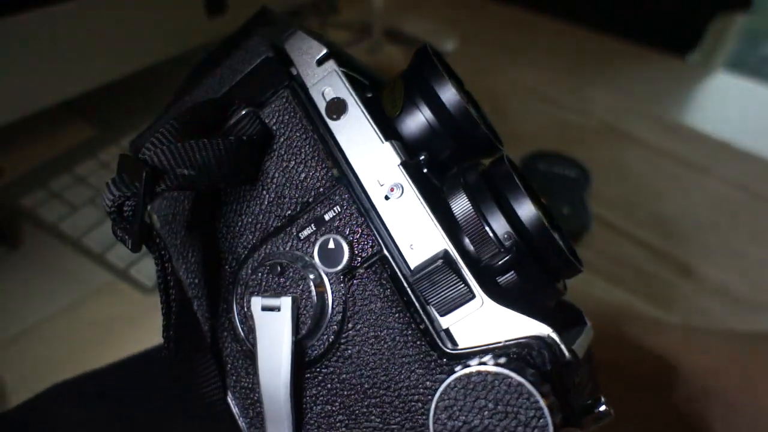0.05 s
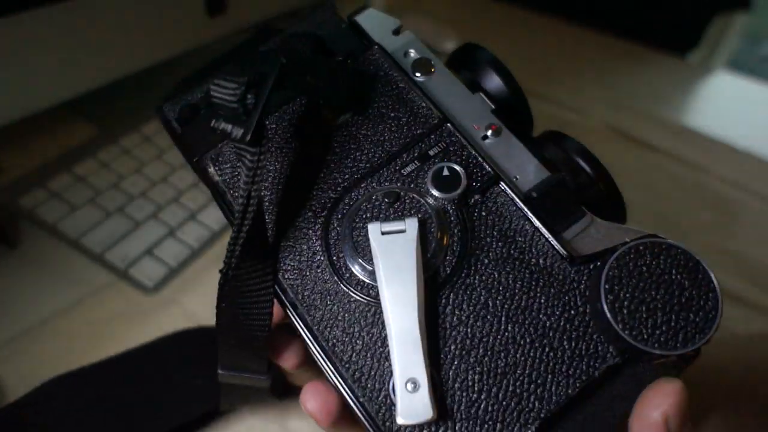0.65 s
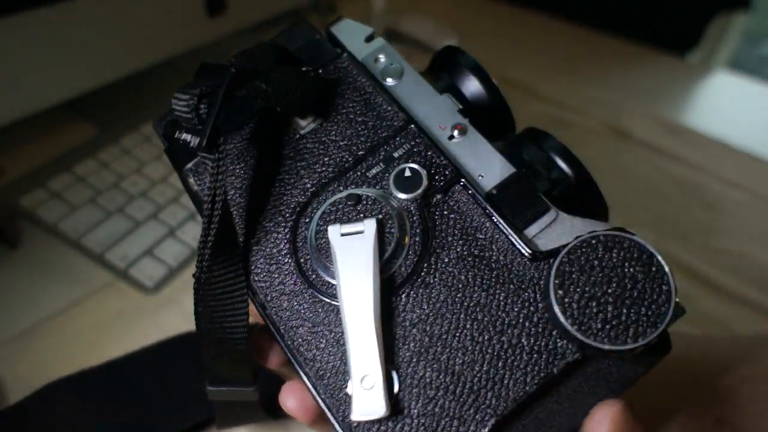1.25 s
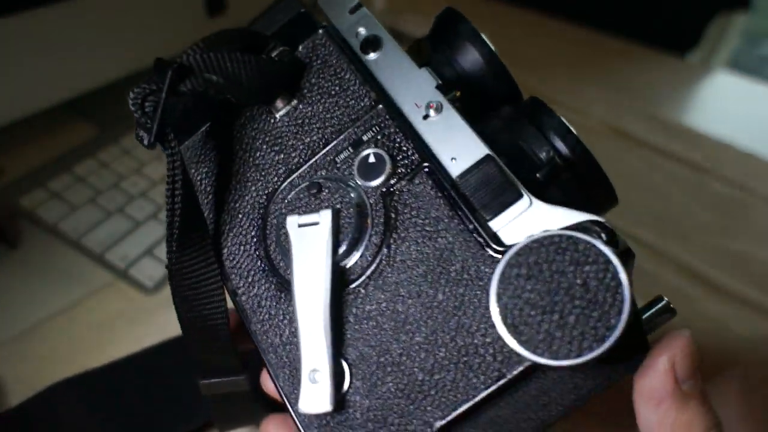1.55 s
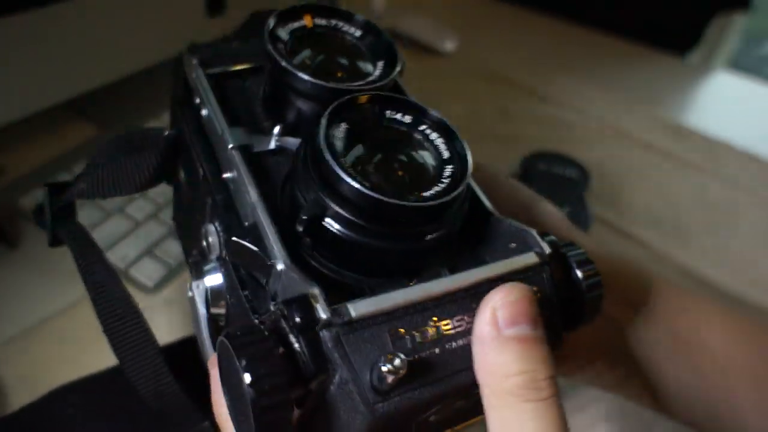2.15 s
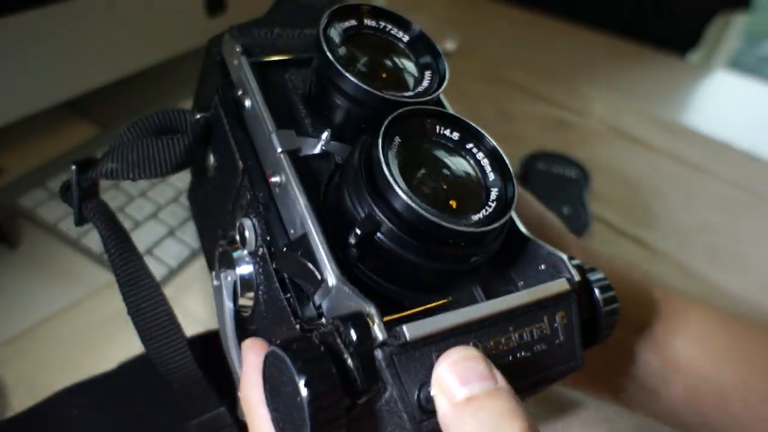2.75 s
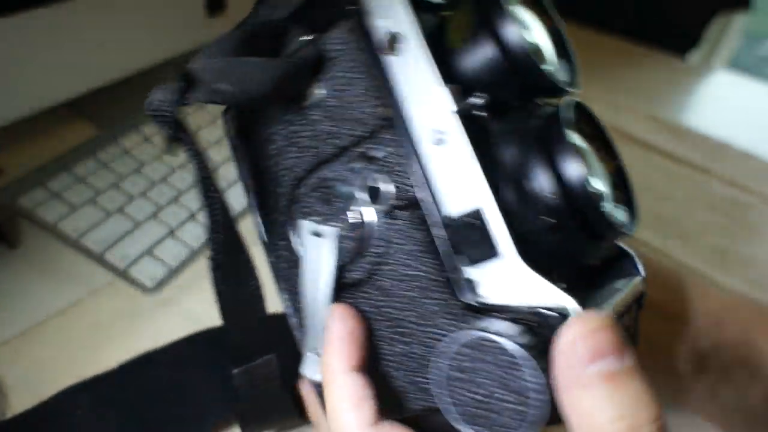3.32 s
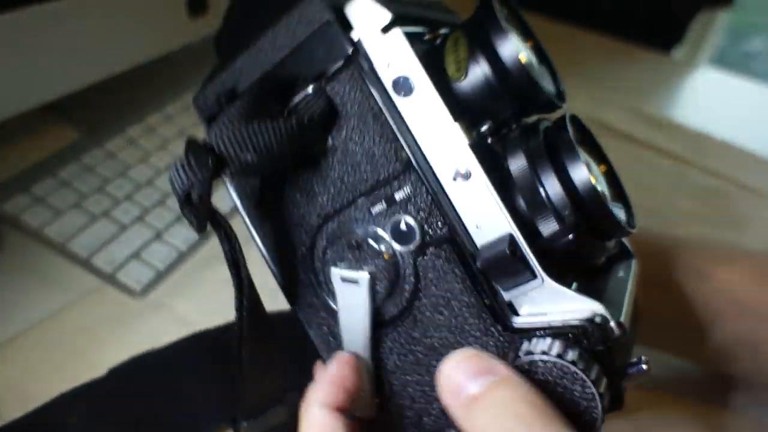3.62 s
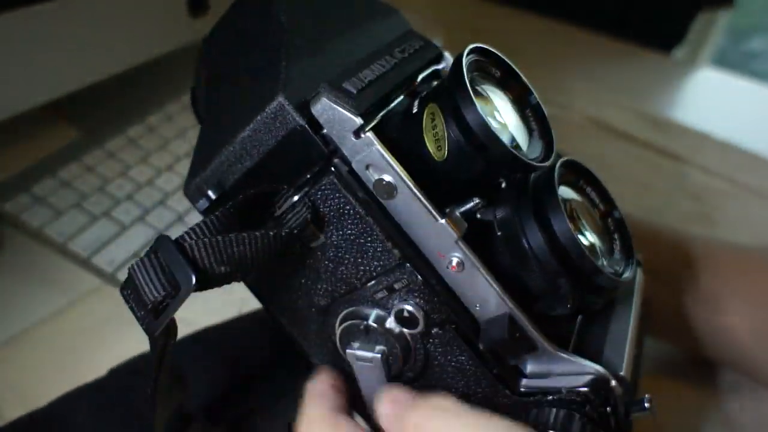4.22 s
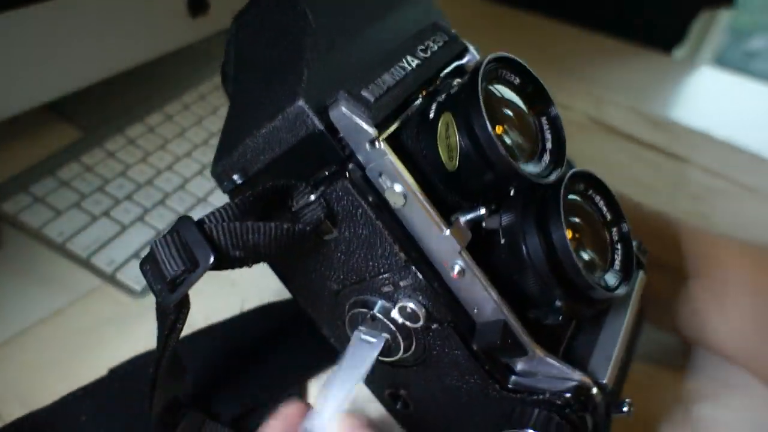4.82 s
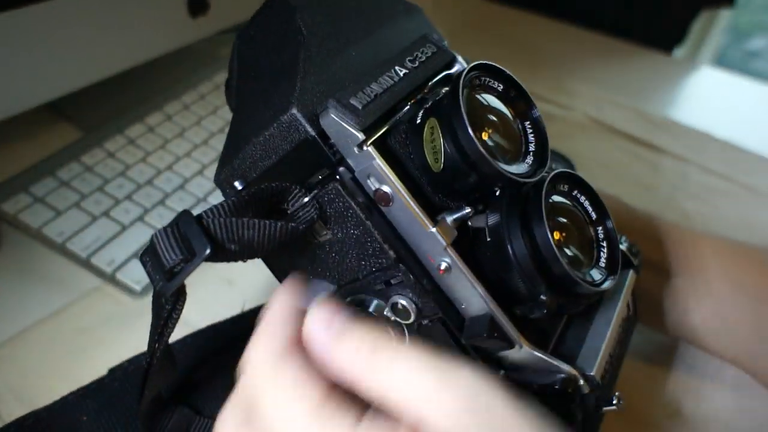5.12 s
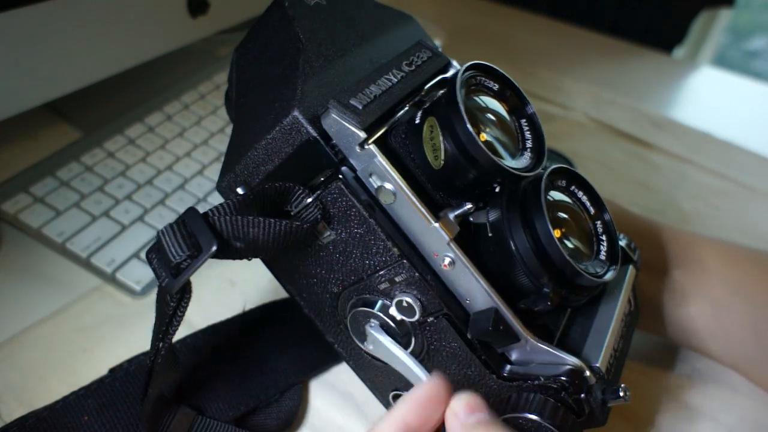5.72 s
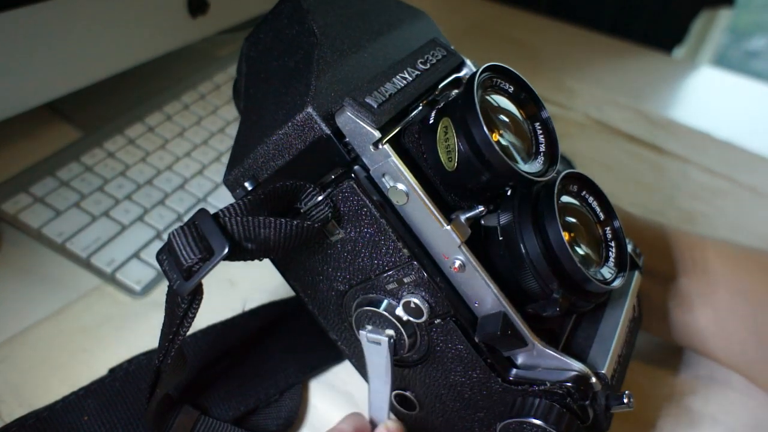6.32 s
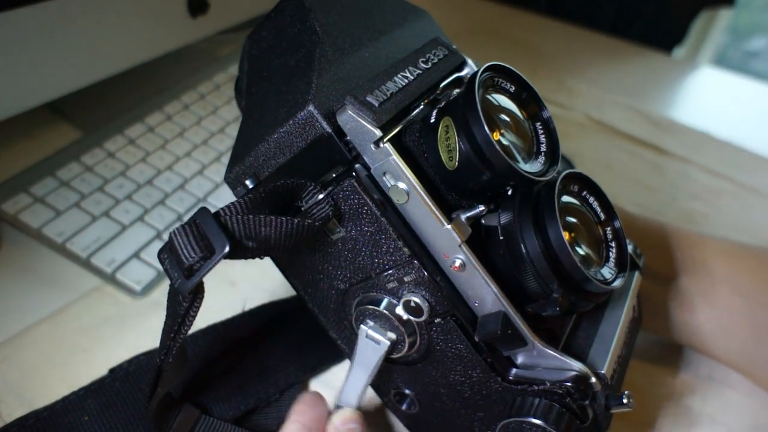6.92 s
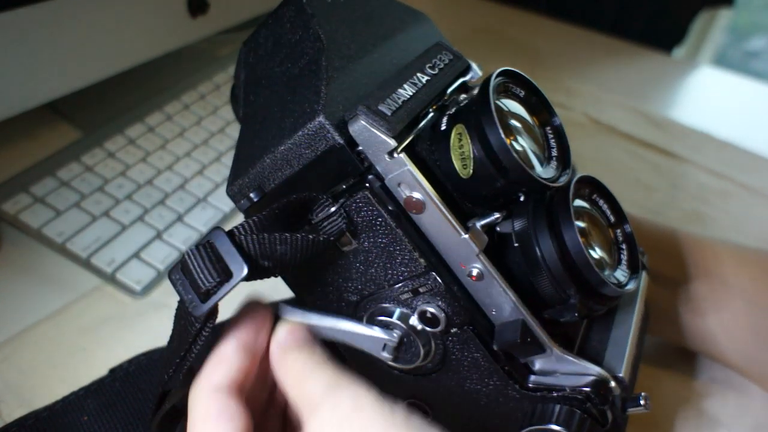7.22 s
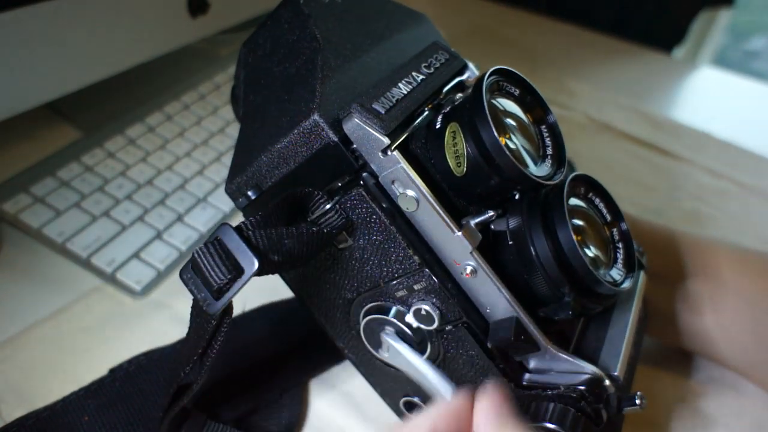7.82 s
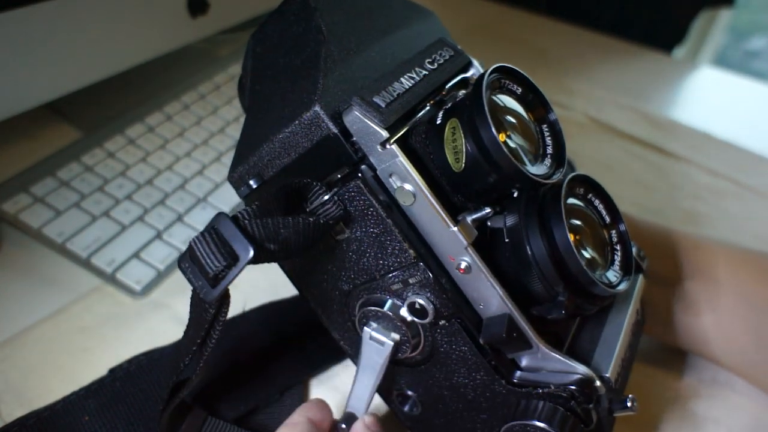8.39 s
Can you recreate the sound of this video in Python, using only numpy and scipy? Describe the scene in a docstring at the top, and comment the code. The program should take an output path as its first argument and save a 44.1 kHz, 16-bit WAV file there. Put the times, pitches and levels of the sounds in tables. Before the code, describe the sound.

A fan hums and hisses softly throughout in a small room, a little to the right. Close to the stereo microphone, a film camera is handled: a faint click and bump come at about 1.7 seconds, then sharper metal clicks near 2.8 and 3 seconds. Around 3.5 seconds the viewing hood snaps open in a quick cluster of bright snaps and hollow, boxy knocks, the loudest moment. The winding crank clacks at 4.5 seconds and again near 5.2, with a faint bump between. From 5.3 to 5.9 seconds it turns with a run of small ratcheting clicks, then inches on in halting ticks until a thin, high snap at about 6.7. From 7 to 8.2 seconds it winds again in a longer, faster ratcheting run, ringing lightly at its quickest near 7.9 seconds. The clicks slow and stop, leaving only the fan.

```python
"""A twin-lens film camera is turned over in the hands and wound, close to a stereo mic in a small room.
Its fittings click, and the viewing hood snaps open and shakes the hollow body. Then the crank goes
round twice, haltingly at first: a pawl drops over the ratchet teeth, and each drop rattles the gears
and rings the wheel. A fan hums and hisses underneath throughout."""
import sys
import numpy as np
from scipy import signal
from scipy.fft import rfft, irfft
from scipy.io import wavfile

SR = 44100
rng = np.random.default_rng(int(sys.argv[2]) if len(sys.argv) > 2 else 0)


def store_wav(level_fs):
    """Save 16-bit WAV to argv[1]."""
    pcm = np.round(np.clip(np.atleast_2d(level_fs), -1, 1) * 32767)
    wavfile.write(sys.argv[1], SR, pcm.T.astype(np.int16))


N = 377055
CLICK_TOP_HZ, BAND_LIMIT_HZ = 11700, 11060

# the colour of the fan's hiss: (frequency [Hz], relative level [dB])
FAN_AIR = [(25, -39), (58, -15), (85, -13), (140, -3.5), (205, -7), (340, -5.5), (800, -5), (1150, -4.5),
           (1900, -3), (3100, -7.5), (4500, -14), (7000, -22.5), (11000, -30)]
# the fan's hum: (frequency [Hz], relative level [dB])
FAN_TONES = [(237, -54.5), (300.5, -57), (716, -59), (816, -58), (1142, -66.5)]
# the fan sits to the right: (frequency [Hz], left minus right [dB])
FAN_PAN = [(60, -5.5), (190, -5.5), (500, -6), (1100, -5.5), (3500, -3.5), (11000, -1)]
# how alike the hiss is at the two capsules: (frequency [Hz], coherence [0-1])
FAN_COHERENCE = [(100, 0.81), (600, 0.57), (2000, 0.67), (5000, 0.33), (11000, 0.32)]
# the hiss is offset between the capsules: (frequency [Hz], right phase lag [rad])
FAN_PHASE = [(100, 0), (1300, 0.63), (2600, 1.56), (5000, 3), (11000, 5.5)]
# catches, springs and fittings snap:
# (time [s], level [dB], centre [Hz], width [Hz], crack level [dB], t60 [s], left minus right [dB])
FITTING_SNAPS = [(1.701, -38, 5000, 4000, -3, 0.026, -3), (2.7870, -25, 3340, 450, 0, 0.05, -4),
                 (2.7876, -25.5, 6040, 450, -7, 0.014, 2), (3.033, -32, 3300, 1500, -4, 0.064, -2),
                 (3.04, -20, 2980, 170, -25, 0.042, -11), (3.042, -30.5, 1100, 700, -22, 0.063, -7),
                 (3.4810, -28, 2900, 700, -16, 0.026, 0), (3.5351, -24.5, 3330, 500, -17, .04, 3),
                 (3.5468, -16, 3640, 400, -5.5, 0.0083, -11), (3.5505, -26, 3430, 450, -11, 0.055, 8),
                 (3.5669, -16, 3400, 600, -12, 0.01, 5), (3.5675, -17, 4900, 450, -12, 0.0077, -7),
                 (3.5891, -28, 2740, 1200, -8, 0.032, -1), (4.899, -42, 5000, 4000, 0, .025, -2),
                 (5.2397, -30, 2950, 700, -11, .022, -5), (6.6545, -27.5, 8840, 1800, -3, 0.019, -8),
                 (6.6560, -39, 10100, 90, -25, 0.11, -3)]
# the dense, short rattle of the gear train: (frequency [Hz], relative level [dB])
GEAR_COLOUR = [(500, -24), (1400, -7), (2750, -9.5), (3150, -4.5), (5200, -5.5), (5800, -8), (7200, -8),
               (9200, -7.5), (10200, -5.5), (11000, -9.5)]
# the hood and the hands bump the body: (time [s], level [dB], hardness [Hz])
BODY_BUMPS = [(1.772, -42.5, 60), (3.487, -31.5, 300), (3.538, -22.5, 250), (3.5515, -22.5, 400),
              (3.5638, -16, 1600), (3.5868, -18.5, 1100), (3.6150, -22, 220), (3.6290, -30.5, 300),
              (4.982, -41.5, 50)]
# the hollow body rings: (frequency [Hz], relative level [dB], t60 [s])
BODY_MODES = [(60, -21, 0.19), (122, -11.5, 0.15), (157, -3, 0.15), (209, 5, 0.13), (278, 3.5, 0.085),
              (375, -1, 0.053), (448, 1.5, 0.056), (508, 4, 0.061), (590, 9.5, 0.054), (730, 11, 0.033),
              (805, 10, 0.037), (1010, 11, 0.028)]
# the crank knocks against its play: (time [s], level [dB], hardness [Hz])
CRANK_KNOCKS = [(4.5112, -26.5, 600), (4.5135, -27, 500), (5.2397, -20.5, 4500), (5.2482, -33, 2500)]
# the crank rings: (frequency [Hz], relative level [dB], t60 [s])
CRANK_MODES = [(1440, 2.5, 0.011), (1576, -2.5, 0.038), (1830, -3, 0.017), (1980, 0.5, 0.013),
               (2330, -5, 0.019), (3100, -0.5, 0.015)]
# the crank is inched on by a single tooth: (time [s])
SINGLE_TEETH = [5.2009, 6.1585, 6.2087, 6.2888, 6.379, 6.508, 6.6066]
# three strokes of the hand on the crank: (time [s], travel [teeth])
FIRST_STROKE = [(5.3377, 0), (5.3958, 3), (5.4659, 6), (5.6116, 9), (5.6488, 10), (5.7295, 14),
                (5.7563, 15), (5.8879, 18)]
NUDGE_STROKE = [(5.996, 0), (6.096, 3)]
SECOND_STROKE = [(6.9493, 0), (7.0028, 1), (7.0739, 3), (7.1233, 5), (7.1728, 8), (7.3859, 19),
                 (7.6759, 30), (7.7085, 32), (7.8037, 35), (7.8615, 38), (7.9651, 45), (8.0114, 47),
                 (8.1415, 51), (8.2116, 54)]
# how hard the pawl drops as the hand bears on the crank: (time [s], relative level [dB])
PAWL_FORCE = [(5.3, -32), (5.85, -31), (6.05, -28), (6.25, -31), (6.5, -27.5), (6.62, -29.5), (7.05, -32),
              (7.25, -29), (7.54, -28), (7.76, -31), (8.14, -27)]
# the clicks change as the wheel turns, singing most when spun fast: (time [s], treble [dB], ring [dB])
CLICK_TONE = [(5.8, -9, 2), (6.3, -2.5, -10), (7.25, -6.5, 2.5), (7.6, -6.5, -1), (7.92, -7, 9),
              (8.06, -12.5, -5), (8.2, -7, -3)]
# the ratchet wheel rings: (frequency [Hz], relative level [dB], t60 [s])
WHEEL_MODES = [(3240, -3.5, 0.017), (3820, -9.5, .035), (4280, -16, .035), (4610, -7, 0.016),
               (5290, -13, 0.042), (5390, -8.5, 0.035), (8160, -10, 0.028), (9970, -10.5, 0.022)]
# the room's decay: (frequency [Hz], t60 [s])
ROOM_DECAY = [(200, 0.29), (1500, 0.41), (5000, 0.18), (11000, 0.23)]


def amp(db):
    """Decibels to gain."""
    return 10 ** (np.asarray(db) / 20)


def curve_at(points, hz):
    """A table's value at hz, on a log-frequency axis."""
    freqs, values = np.transpose(points)
    return np.interp(np.log(hz + 1), np.log(freqs + 1), values)


def unit_rms(x):
    """Scales to an rms of 1."""
    return x / np.sqrt(np.mean(x ** 2) + 1e-20)


def placed(hit, db, pan_db, attack=190):
    """Levels and pans a stereo hit by its first `attack` samples; positive pan is left."""
    sides = unit_rms(amp([[pan_db / 2], [-pan_db / 2]]))
    return amp(db) * sides * hit / np.sqrt(np.mean(hit[:, :attack] ** 2, 1, keepdims=True) + 1e-20)


def add(mix, start_s, sound):
    """Mixes a stereo sound in at its cue."""
    part = mix[:, round(start_s * SR):][:, :sound.shape[1]]
    part += sound[:, :part.shape[1]]


def axes(size):
    """Times and frequencies for `size` samples."""
    return np.arange(size) / SR, np.fft.rfftfreq(size, 1 / SR)


def coloured(noise, gain):
    """Noise with the given spectrum, rms 1."""
    return unit_rms(irfft(rfft(noise) * gain, noise.shape[-1]))


def envelope(t, t60, rise_s=0.000067):
    """A quick attack and an exponential decay."""
    return (1 - np.exp(-t / rise_s)) * amp(-60 * t / t60)


def ring(modes, t, hard_hz, spread_rad, rise_s):
    """Damped modes, each in its own phase at each capsule; a soft blow misses the high ones."""
    out = 0
    for k, (hz, db, t60) in enumerate(modes):
        phase = k * np.pi + spread_rad * rng.standard_normal((2, 1))
        gain = amp(db) / (1 + (hz / hard_hz) ** 2)
        out = out + gain * envelope(t, t60, rise_s) * np.sin(2 * np.pi * hz * t + phase)
    return out


def blows(cues, modes, spread_rad, contact_cycles, pan_db, attack=190):
    """Blows on one object; a soft blow stays in contact longer and swells slowly."""
    t, _ = axes(16384)
    out = np.zeros((2, N))
    for start_s, db, hard_hz in cues:
        hit = ring(modes, t, hard_hz, spread_rad, rise_s=contact_cycles / hard_hz)
        add(out, start_s, placed(hit, db, pan_db, attack))
    return out


def fan(air_db=-36.5, hum_gain_db=1, waver_rad=0.32, waver_hz=4.2):
    """A bed of steady air noise and slightly wavering tones, nearer the right capsule."""
    t, hz = axes(N)
    left, unrelated = rfft(rng.standard_normal((2, N)))
    coherence = curve_at(FAN_COHERENCE, hz)
    right = coherence * left + np.sqrt(1 - coherence ** 2) * unrelated
    right *= np.exp(-1j * curve_at(FAN_PHASE, hz))
    pan = amp(curve_at(FAN_PAN, hz) / 2)
    colour = amp(curve_at(FAN_AIR, hz)) * (hz < BAND_LIMIT_HZ)
    air = unit_rms(irfft(np.array([left * pan, right / pan]) * colour, N))
    hum = 0
    for tone_hz, db in FAN_TONES:
        drift = waver_rad * coloured(rng.standard_normal((2, N)), 1 / (1 + (hz / waver_hz) ** 2))
        sides = amp(curve_at(FAN_PAN, tone_hz) * np.array([[.5], [-.5]]))
        hum = hum + sides * amp(db) * np.sqrt(2) * np.sin(2 * np.pi * tone_hz * t + drift)
    return amp(air_db) * air + amp(hum_gain_db) * hum


def fittings():
    """Small metal parts snap: one resonance under a bright crack."""
    t, hz = axes(8192)
    out = np.zeros((2, N))
    crack_colour = amp(curve_at(GEAR_COLOUR, hz)) * hz / (hz + 4000) * (hz < CLICK_TOP_HZ)
    for start_s, db, centre_hz, width_hz, crack_db, t60, pan_db in FITTING_SNAPS:
        metal_noise, crack_noise = rng.standard_normal((2, 2, len(t)))
        resonance = 1 / (1 + ((hz - centre_hz) / width_hz) ** 2)
        metal = placed(coloured(metal_noise, resonance), db=0, pan_db=0)
        crack = amp(crack_db) * coloured(crack_noise, crack_colour)
        add(out, start_s, placed((metal + crack) * envelope(t, t60), db, pan_db, attack=130))
    return out


def body_bumps():
    """The hood and the hands knock a low, boxy ring out of the hollow body."""
    return blows(BODY_BUMPS, BODY_MODES, spread_rad=1.18, contact_cycles=0.17, pan_db=-7.5, attack=400)


def crank_knocks():
    """The crank takes up its play with a short metal clack."""
    return blows(CRANK_KNOCKS, CRANK_MODES, spread_rad=1.0, contact_cycles=0.28, pan_db=-5)


def pawl_drops(uneven_db=0.8, tick_db=-12, tick_spread_db=3, tick_scatter=0.12):
    """One drop for each tooth passed, and a lighter tick after it: (time [s], level [dB])."""
    strokes = [SINGLE_TEETH]
    for stroke in FIRST_STROKE, NUDGE_STROKE, SECOND_STROKE:
        times, teeth = np.transpose(stroke)
        strokes.append(np.interp(np.arange(round(teeth[-1]) + 1), teeth, times))
    drop_s = np.sort(np.concatenate(strokes))
    uneven, lateness, weight = rng.standard_normal((len(drop_s), 3)).T
    drop_db = np.interp(drop_s, *np.transpose(PAWL_FORCE)) + uneven_db * uneven
    # the tick lands a third of the way to the next tooth, or after about 15 ms if that is sooner
    wait_s = np.minimum(0.34 * np.diff(drop_s, append=N / SR), 0.015)
    tick_s = drop_s + wait_s * (1 + tick_scatter * lateness)
    return zip(np.r_[drop_s, tick_s], np.r_[drop_db, drop_db + tick_db + tick_spread_db * weight])


def ratchet(low_t60=0.014, high_t60=0.019, rise_s=0.00027, rebound_s=0.00186, rebound_db=-2,
            wheel_trim_db=-6, alike=0.23, trim_db=-0.9, pan_db=-3):
    """Each drop of the pawl strikes the gear train, rebounds once and rings the wheel."""
    t, hz = axes(4096)
    out = np.zeros((2, N))
    treble_band = 1 / (1 + (5800 / (hz + 1)) ** 8)
    shared = rng.standard_normal((2, len(t)))
    times, treble_db, ring_db = np.transpose(CLICK_TONE)
    for start_s, db in pawl_drops():
        # a light tick is thinner than a full drop
        bright_db = np.interp(start_s, times, treble_db) + .5 * max(-24 - db, 0) + rng.standard_normal()
        colour = amp(curve_at(GEAR_COLOUR, hz) + bright_db * treble_band) * (hz < CLICK_TOP_HZ)
        # every tooth shakes the same metal, but touches it a little differently
        noise = np.sqrt(alike) * shared + np.sqrt(1 - alike) * rng.standard_normal(shared.shape)
        shake = coloured(noise, colour)
        treble = irfft(rfft(shake) * treble_band)
        low = (shake - treble) * envelope(t, low_t60, rise_s)
        high = treble * envelope(t, high_t60, rise_s)
        # the softer rebound repeats the strike, combing the click into evenly spaced pitches
        lag = round(rebound_s * rng.normal(1, .05) * SR)
        click = low + high + amp(rebound_db) * np.roll(low + high / 2, lag, axis=1)
        # the pawl's pressure detunes the wheel slightly from tooth to tooth
        detune = rng.normal(1, 0.0059)
        wheel = ring(WHEEL_MODES, t * detune, hard_hz=SR, spread_rad=2.6, rise_s=rise_s)
        click += amp(wheel_trim_db + np.interp(start_s, times, ring_db)) * wheel
        add(out, start_s, placed(click, db + trim_db, rng.normal(pan_db, 1)))
    return out


def room(send, predelay_s=0.0045, desk_db=-14, desk_s=0.0062):
    """A slap off the desk and a short diffuse tail that dies soonest in the treble."""
    t, _ = axes(16384)
    noise = rng.standard_normal((2, len(t))) * (t > predelay_s)
    hz, frame_s, spectra = signal.stft(noise, SR, nperseg=256)
    decay = amp(-60 * frame_s / curve_at(ROOM_DECAY, hz)[:, None])
    _, response = signal.istft(spectra * decay, SR, nperseg=256)
    response /= np.linalg.norm(response[0])
    response[:, round(desk_s * SR)] += amp(desk_db)
    return signal.fftconvolve(send, response, axes=1)[:, :N]


def scene():
    """The camera up close, its reverb, and the fan underneath."""
    clicks, snaps, knocks, bumps = ratchet(), fittings(), crank_knocks(), body_bumps()
    reverb = room(amp(-6) * clicks + amp(-14) * snaps + amp(-10) * (knocks + bumps))
    return clicks + snaps + knocks + bumps + reverb + fan()


def record(dry):
    """The recorder clips at full scale and passes nothing above its band limit."""
    lowpass = signal.firwin(161, BAND_LIMIT_HZ, window=("kaiser", 9), fs=SR)
    return signal.oaconvolve(np.clip(dry, -1, 1), lowpass[None], "same", axes=1)


dry = scene()
out = record(dry)
store_wav(out)
```